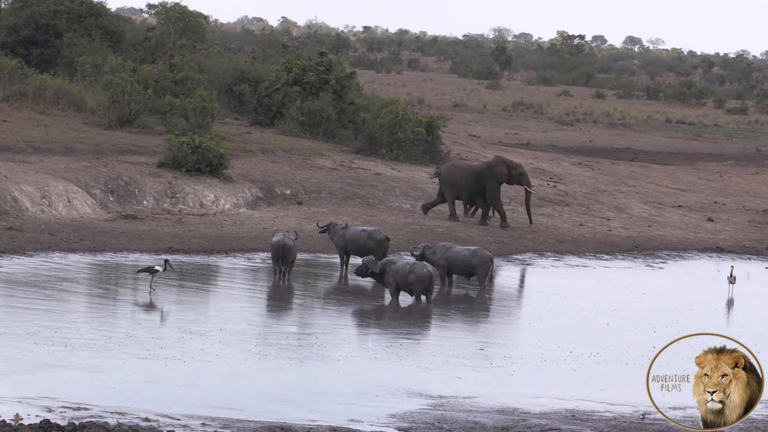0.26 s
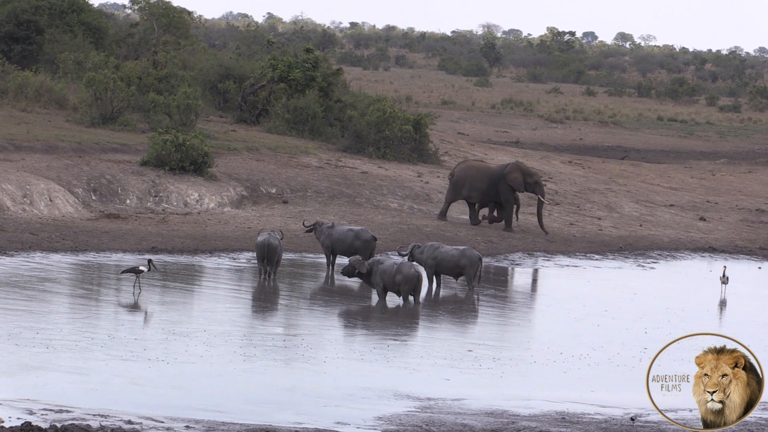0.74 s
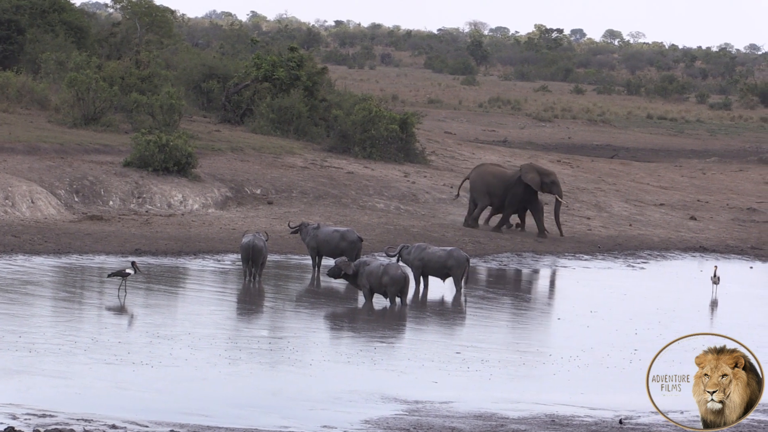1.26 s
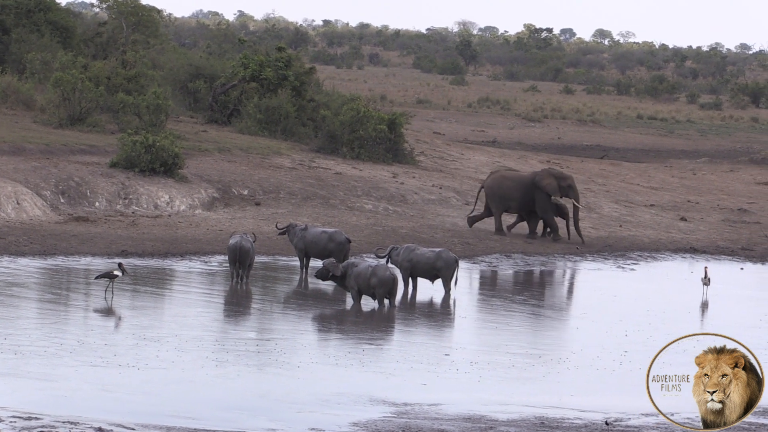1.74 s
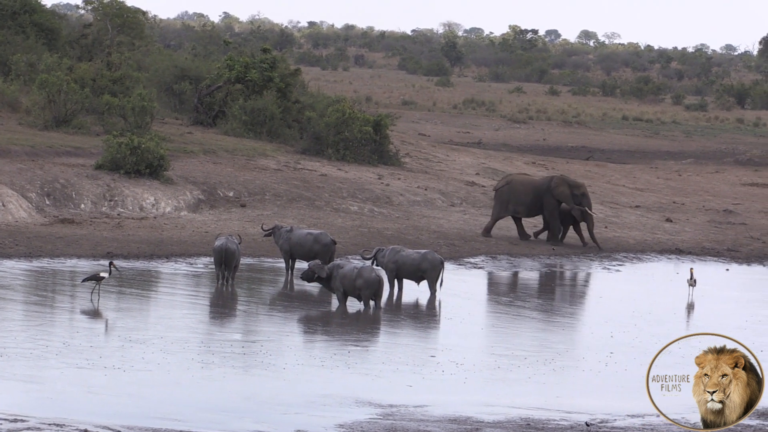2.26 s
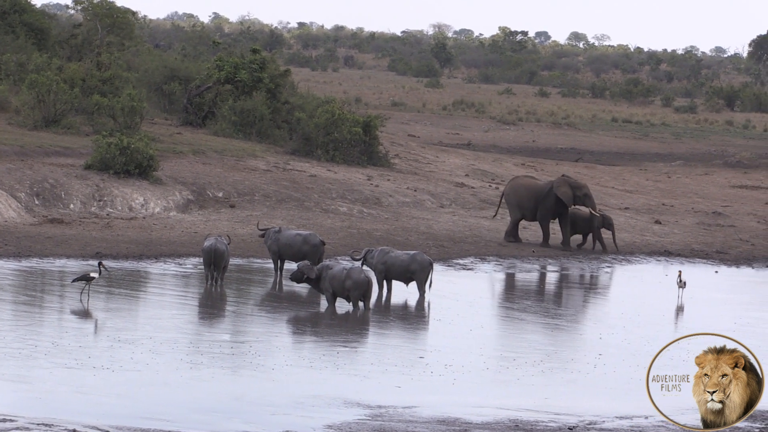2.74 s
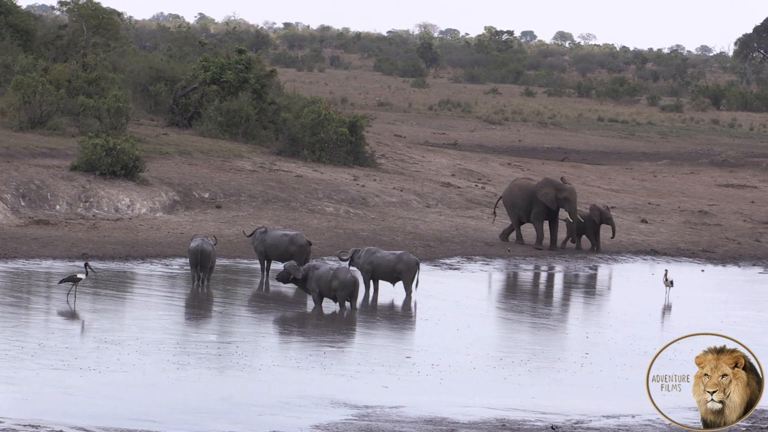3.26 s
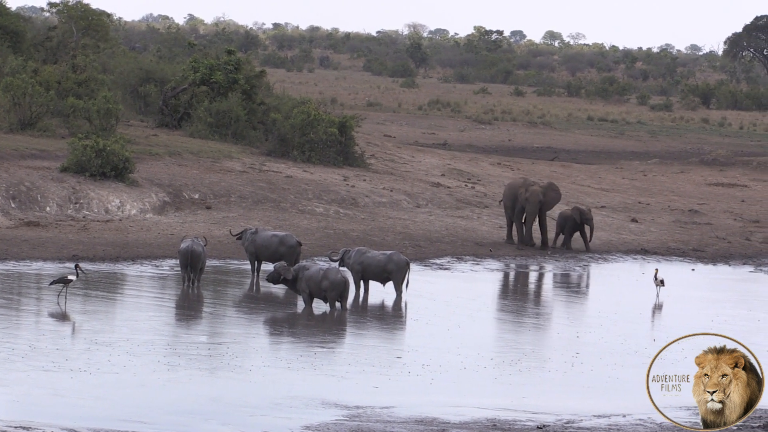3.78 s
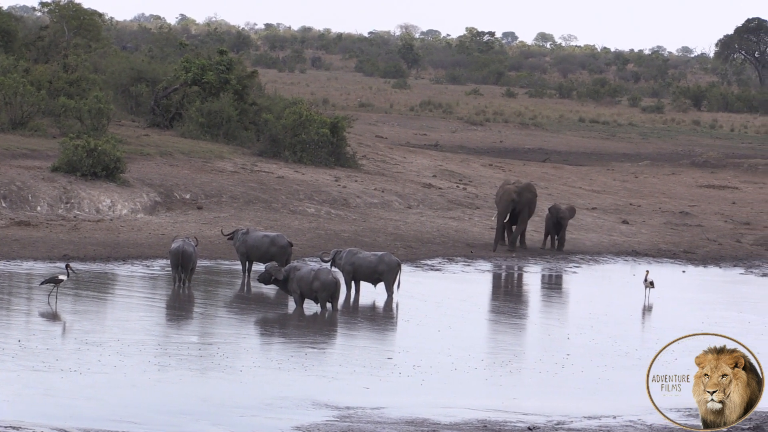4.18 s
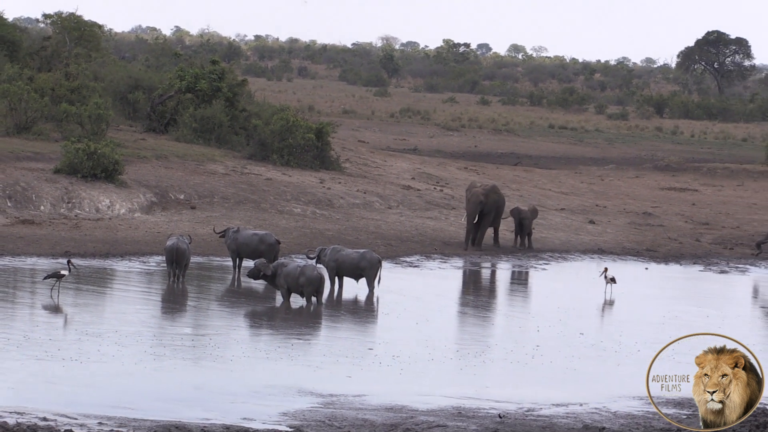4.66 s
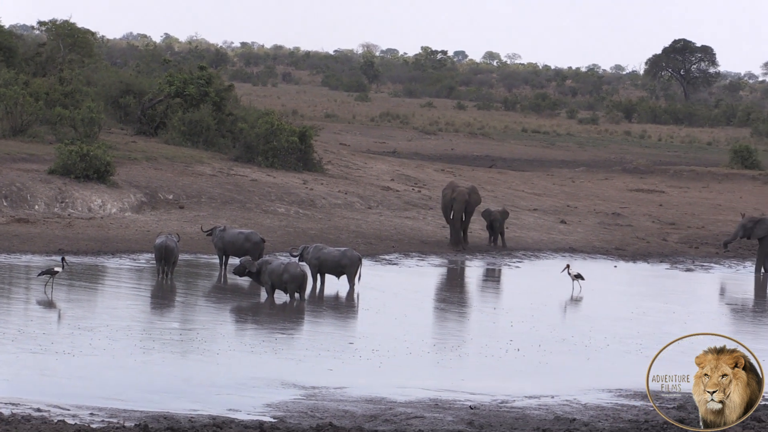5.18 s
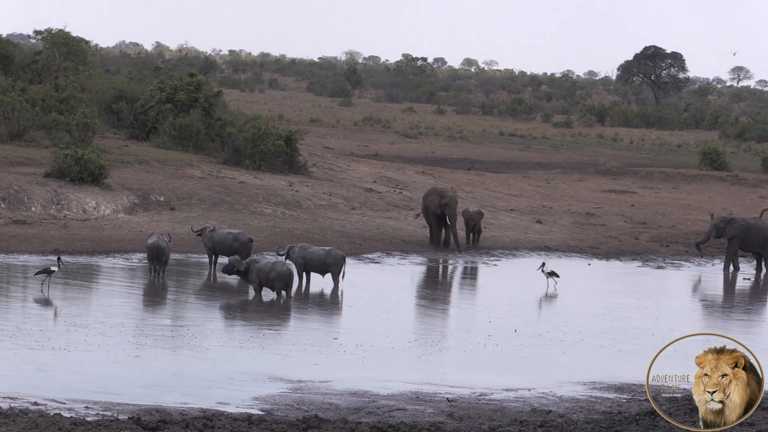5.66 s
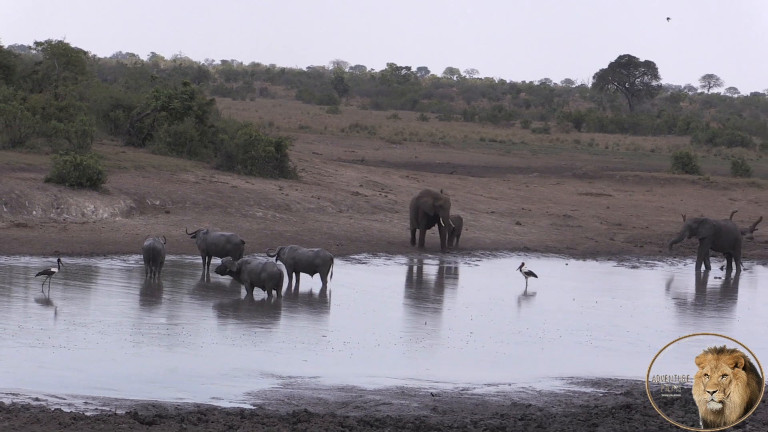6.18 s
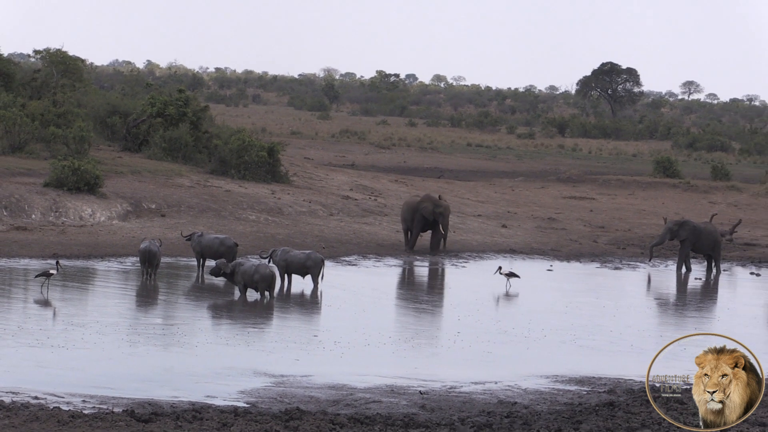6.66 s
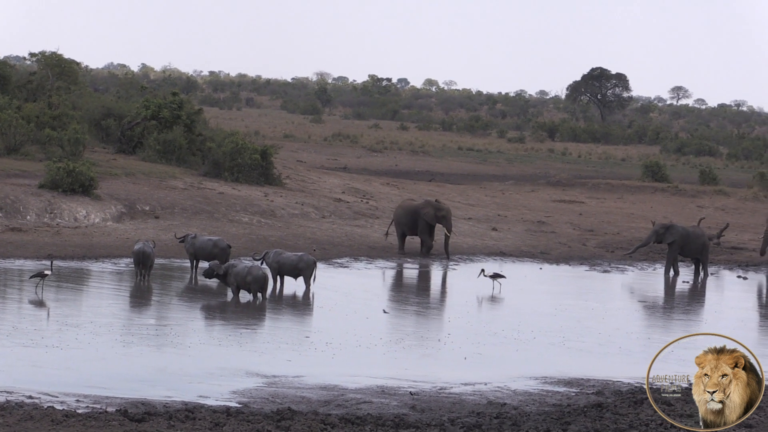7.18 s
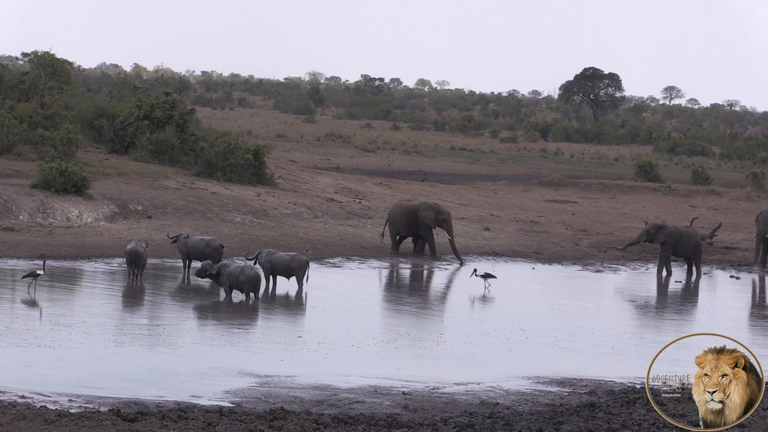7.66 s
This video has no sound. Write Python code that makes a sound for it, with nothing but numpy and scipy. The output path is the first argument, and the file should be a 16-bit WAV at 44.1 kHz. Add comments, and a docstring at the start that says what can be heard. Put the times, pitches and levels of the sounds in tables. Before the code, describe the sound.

Quick warbling bird whistles go on over soft open air and a faint engine hum, while wading animals splash and the water plops once.

```python
"""A waterhole in the bush. From the start, a few birds chatter in sliding, trilled whistles, small birds
chirp far off, and an engine idles low beneath the soft rush of open air. In the first second or so,
a puff of wind rumbles on the microphone. Wading animals then splash lightly, and at 3-4 s they push
the water in long swishes. Just after 5 s an air pocket rings with one hollow plop. The whistles go
on a little louder to the end, echoing off the banks, with two more splashes near 7 s."""
import sys
import numpy as np
from scipy import signal
from scipy.fft import rfft, irfft, next_fast_len
from scipy.io import wavfile
from scipy.ndimage import map_coordinates

SR = 44100
rng = np.random.default_rng(int(sys.argv[2]) if len(sys.argv) > 2 else 0)


def store_wav(level_fs):
    """Save 16-bit WAV to argv[1]."""
    pcm = np.round(np.clip(np.atleast_2d(level_fs), -1, 1) * 32767)
    wavfile.write(sys.argv[1], SR, pcm.T.astype(np.int16))


N = 349272  # samples, about 7.9 s


def flock(trill_db=1.14, leap=.28, yodel_beat_s=.04, yodel_beats=1.79):
    """Birds on different perches whistle three kinds of call, each with its own strength of echo."""
    # A flick is a quick jump up in pitch and back. It starts from the base pitch; leap sets its height.
    # Trills, rows of even flicks:
    # (first flick [s], base pitch [Hz], level [dB], beat [s], length after that flick [s])
    trill_calls = [(0.135, 1745, -46.5, 0.0201, 0.041), (0.8, 1754, -49.5, 0.0396, 0.069),
                   (.925, 1942, -48, 0.016, 0.044), (1.1, 1765, -46.5, 0.026, 0.0796),
                   (1.191, 1788, -47.5, 0.022, 0.07), (1.842, 1770, -47, 0.031, 0.069),
                   (2.233, 1827, -45.5, 0.024, 0.015), (2.761, 1800, -46.5, 0.0231, 0.072),
                   (3.161, 1792, -46.5, 0.022, 0.069), (3.353, 1756, -46, 0.028, 0.13),
                   (3.488, 1778, -50.5, 0.033, 0.075), (3.753, 1717, -46, 0.03, 0.089),
                   (3.975, 1960, -44.5, 0.016, 0.063), (4.083, 1784, -50, 0.0215, 0.098),
                   (4.174, 2025, -47, 0.022, 0.067), (4.368, 1714, -44, 0.03, 0.1),
                   (4.668, 1766, -51, 0.025, 0.057), (4.826, 1792, -42, 0.032, 0.084),
                   (4.857, 1870, -51, 0.038, 0.05), (5.245, 1775, -42.0, 0.026, 0.081),
                   (5.532, 1784, -43, 0.032, 0.12), (5.6, 1886, -50.5, 0.0289, 0.086),
                   (5.935, 1767, -41.5, 0.034, 0.084), (5.987, 1904, -44, 0.025, 0.063),
                   (6.289, 1768, -41, 0.0267, 0.053), (6.309, 1852, -40.5, 0.021, 0.056),
                   (6.509, 1808, -43, 0.034, 0.075), (6.548, 1834, -52, 0.029, 0.059),
                   (6.639, 1805, -43.5, 0.027, 0.075), (6.855, 1798, -43.5, 0.0352, 0.091),
                   (6.881, 1720, -46.5, 0.0218, 0.056), (7.03, 1738, -46, 0.03, 0.077),
                   (7.092, 1807, -51, 0.037, 0.088), (7.5, 1800, -48, 0.018, 0.061),
                   (7.577, 1736, -50, 0.036, 0.077)]
    # Yodels, one flick and then a falling arch: (flick [s], base pitch [Hz], level [dB])
    yodel_calls = [(0.095, 1993, -47), (1.621, 1955, -46.5), (2.005, 1967, -46.5), (2.652, 1940, -47),
                   (3.143, 1970, -49), (3.927, 2040, -48.5), (4.222, 1925, -47.5), (4.596, 1980, -46),
                   (4.967, 1938, -44), (5.549, 1907, -43), (5.91, 1950, -46.5), (6.341, 1875, -46.5),
                   (6.75, 1795, -46), (7.274, 1780, -45.0), (7.46, 1794, -44), (7.621, 1762, -43.5),
                   (7.863, 1752, -42.5)]
    # Whips, one peak that breaks off or sinks back: (peak [s], base pitch [Hz], level [dB], fall [s])
    whip_calls = [(0.195, 1855, -45, 0.033), (0.763, 1790, -51, 0.011), (0.842, 1908, -47, 0.0024),
                  (.89, 1834, -48.5, 0.0099), (1.31, 2060, -43.5, 0.002), (1.39, 2016, -45.5, 0.0026),
                  (1.881, 2032, -44, 0.0056), (1.96, 1920, -43.5, 0.02), (2.267, 1870, -44.0, 0.041),
                  (2.359, 2070, -45.5, 0.0033), (2.434, 2030, -45.5, 0.00317), (2.473, 1820, -45.5, 0.004),
                  (2.559, 1800, -42.5, 0.0041), (3.215, 1840, -41, 0.019), (3.523, 1875, -47, 0.041),
                  (4.302, 1746, -43.5, 0.014), (4.717, 1830, -55, 0.014), (5.076, 1853, -45, 0.0097),
                  (5.167, 1829, -43.5, 0.0048), (5.18, 1900, -45, 0.0036), (5.279, 1932, -39.5, 0.0068),
                  (5.359, 1920, -37.5, 0.011), (6.246, 1954, -38.5, 0.0072), (6.437, 1902, -42.5, 0.011),
                  (6.701, 1980, -43, 0.0128), (6.963, 1756, -47, 0.0035), (7.171, 2016, -40, 0.019),
                  (7.258, 2003, -41, 0.01), (7.488, 1920, -45, 0.011), (7.622, 1718, -42.5, 0.0018),
                  (7.892, 1885, -52, 0.016)]
    trills = [(*row, leap) for row in trill_calls]
    yodels = [(s, hz, db, yodel_beat_s, yodel_beats * yodel_beat_s, leap) for s, hz, db in yodel_calls]
    width_s, whip_leap, half_leap_s = .028, .212, .0127  # a longer fall makes a whip wider and lower
    whips = [(s, hz, db, width_s + fall, fall, whip_leap / (1 + fall / half_leap_s))
             for s, hz, db, fall in whip_calls]
    return (amp(trill_db) * whistles(trills, trill_tune, echo_db=-5.5)
            + whistles(yodels, yodel_tune, echo_db=-10)
            + whistles(whips, whip_tune, echo_db=-14.5))


def whistles(calls, tune, echo_db, throat_hz=1995, throat_width_hz=185, slide_s=.051, echo_s=.0085):
    """Nearly pure whistles slide up into a tune, loudest near the pitch at which the throat rings."""
    waver, flutter_db, slide_db = .019, 2.5, -2
    overtone_db, loud_db = -36, -37.5
    onset_s, release_s = .007, .0054
    track, size = np.zeros(N), SR // 3
    t = np.arange(size) / SR - slide_s  # zero at the first flick
    for s, base_hz, db, beat, length, leap in calls:
        early, late = np.clip(-t / slide_s, 0, 1), np.clip(t / length, 0, 1)
        sag = .0795 * early + .08 * early ** 4 + .0712 * late ** 4  # the pitch is low at both ends
        strain = np.clip(1 - 2 * early, .4, 1)  # the slide is smoother than the flicks
        hz = base_hz * (1 - sag + leap * tune(t / beat))
        hz *= 1 + strain * waver * wobble(504.8, size)
        gate = np.clip((t + slide_s) / onset_s, 0, 1) * np.clip((length - t) / release_s + .5, 0, 1)
        level = db + slide_db * np.minimum(2 * early, 1) - ((hz - throat_hz) / throat_width_hz) ** 2
        level += strain * flutter_db * wobble(300, size)
        phase = 2 * np.pi * np.cumsum(hz) / SR
        overtone = amp(overtone_db + db - loud_db) * np.sin(3 * phase)  # louder calls are brighter
        call = gate * amp(level) * (np.sin(phase) + overtone) / np.hypot(1, amp(echo_db))
        add(track, s - slide_s, call)
        delay = echo_s * (1 + rng.uniform(-1, 1) / 10)  # the near shore repeats each whistle
        add(track, s - slide_s + delay, amp(echo_db) * call)
    return track


def trill_tune(beats, narrow=5.17, shrink=.88):
    """A row of flicks, each a little lower than the last."""
    return flick(beats, narrow) * shrink ** np.maximum(beats, 0)


def yodel_tune(beats):
    """A sharp flick, a dip, then a broad arch that falls away."""
    # The path of the pitch: (time after the flick [beats], height [0 = base, 1 = top])
    pitch_path = [(-.25, 0), (0, 1), (.35, 0), (.55, -.1), (.9, 1), (1.3, .85), (2, -.1)]
    return np.interp(beats, *np.transpose(pitch_path))


def whip_tune(beats, narrow=3.36):
    """A single flick."""
    return flick(np.minimum(beats, .5), narrow)


def flick(beats, narrow):
    """One pitch peak per beat, quick up and slower down."""
    angle = np.pi * np.maximum(beats, -.5)
    return np.abs(np.cos(angle - .3 * np.sin(angle) ** 2)) ** narrow


def water(fizz_q=3):
    """Wading pushes a low wash ahead and throws up spray, with a fizz of falling droplets."""
    # Splashes: (loudest moment [s], rise [s], fall [s], level [dB], graininess [dB])
    splashes = [(.29, .01, .012, -65, 2), (1.375, 0.055, 0.024, -65, 4), (1.48, 0.035, 0.027, -65, 0),
                (1.6, 0.056, 0.033, -69, 4.5), (1.68, .024, 0.081, -55, 2.5), (3.022, 0.13, 0.13, -59, 2),
                (3.84, .17, .17, -54.5, 2.2), (4.25, 0.22, 0.22, -63, 1.5), (6.85, 0.17, .12, -62, 3.5),
                (7.71, 0.034, 0.024, -61.5, 3.5)]
    # Tone colour of the spray: (frequency [Hz], relative level [dB])
    spray_colour = [(900, -44), (1800, 3), (4000, -4.5), (6000, -10.5), (8000, -22.5), (13000, -50)]
    # Showers of fine droplets: (loudest moment [s], half-length [s], pitch [Hz], level [dB])
    droplets = [(1.373, 0.02, 7500, -71), (1.474, 0.017, 8000, -71), (1.658, .08, 6840, -72.5),
                (3.034, 0.041, 4640, -78)]
    # Water pushed aside: (time [s], level [dB])
    wash_levels = [(0, -71), (2.2, -63), (2.8, -56), (3.4, -52.5), (3.9, -51.5), (4.2, -57), (4.5, -93),
                   (7.9, -86)]
    # Tone colour of that wash: (frequency [Hz], relative level [dB])
    wash_colour = [(200, -21), (400, -4.5), (560, 4), (850, -6.5), (1300, -0.5), (1700, -22.5), (3000, -16),
                   (6000, -41)]
    t, grains = np.arange(N) / SR, wobble(400)
    spray_gain, fizz = np.zeros(N), np.zeros((2, N))
    for s, rise, fall, db, grain_db in splashes:
        width = np.where(t < s, rise, fall)
        spray_gain += amp(db + grain_db * grains) * np.exp(-((t - s) / width) ** 2 / np.sqrt(2))
    for s, half_length, hz, db in droplets:
        hiss = signal.lfilter(*signal.iirpeak(hz, fizz_q, SR), rng.standard_normal((2, N)))
        fizz += amp(db) * np.exp(-((t - s) / half_length) ** 2 / 2) * unit(hiss)
    wash = amp(curve(wash_levels)) * rush(wash_colour)
    return wash + spray_gain * rush(spray_colour) + fizz


def plop(s=5.195, hz=355, rise_per_s=4, db=-24, swell_s=.0058, ring_s=.061):
    """A big air pocket rings in the water, rising in pitch as it nears the surface."""
    track, t = np.zeros(N), np.arange(SR // 6) / SR
    ring = np.sin(2 * np.pi * hz * (t + rise_per_s * t * t / 2))
    swell = 1 - np.exp(-(t / swell_s) ** 2)
    add(track, s, amp(db - 60 * t / ring_s) * swell * ring)
    return track


def wind(cycles=.42):
    """Big swirls of air push the microphone to and fro; small ones rumble differently on each side."""
    # Pushes from big swirls: (time [s], pitch [Hz], level [dB], lean to the left [dB])
    pushes = [(0.373, 75, -41.5, -4), (0.467, 84, -39, -8), (.631, 125, -36.5, 8), (0.697, 74, -39.5, 9),
              (.73, 52, -36, 2), (0.748, 119, -45, 1), (0.833, 88, -39, 6), (1.234, 90, -43, -9)]
    # Strength of the rumble: (time [s], level [dB])
    rumble_levels = [(.25, -72), (.47, -48), (.57, -59), (.7, -39.5), (.92, -66), (1.22, -52.5), (2, -73)]
    # Tone colour of the small swirls: (frequency [Hz], relative level [dB])
    rumble_colour = [(20, -20.5), (55, 4), (80, -8), (110, 0.5), (200, -20), (400, -35), (900, -84)]
    bumps, t = np.zeros((2, N)), np.arange(-SR // 20, SR // 20) / SR
    for s, hz, db, lean_db in pushes:
        push = np.exp(-(t * hz / cycles) ** 2) * np.sin(2 * np.pi * hz * t)
        for side, sign in zip(bumps, (1, -1)):
            add(side, s + t[0], amp(db + sign * lean_db) * push)
    rumble = unit(filtered(rng.standard_normal((2, N)), lambda hz: amp(along(rumble_colour, hz))))
    return bumps + amp(curve(rumble_levels)) * rumble


def ticks(fade_s=.031, q=1.7):
    """Small ticks and drips: bursts of noise around one pitch that die away at once."""
    # Ticks and drips: (time [s], pitch [Hz], level [dB])
    hits = [(1.479, 2980, -55), (1.653, 3170, -49.5), (1.662, 3300, -59), (2.361, 3400, -55),
            (5.196, 3600, -61.5), (6.43, 2980, -60), (6.833, 1700, -58)]
    track, t = np.zeros(N), np.arange(SR // 20) / SR
    for s, hz, db in hits:
        crack = unit(signal.filtfilt(*signal.iirpeak(hz, q, SR), rng.standard_normal(len(t))))
        add(track, s, amp(db - 60 * t / fade_s) * crack)
    return track


def rasps(fall_share=.44, waver=.009, swell_share=.26, uneven_db=3):
    """A small bird's raspy chirp drops in pitch while its overtones swell one after another."""
    # Chirps: (time [s], length [s], starting pitch [Hz], level [dB])
    chirps = [(1.264, 0.094, 730, -66.5), (2.166, .115, 824, -66.5), (4.431, 0.14, 863, -66.5),
              (5.408, .105, 785, -68.5), (5.585, 0.14, 803, -67), (6.129, .11, 826, -60.5),
              (6.874, .08, 797, -65.5)]
    # Their overtones: (frequency [times the pitch], loudest point [share of the length], level [dB])
    overtones = [(6, .16, -3), (7, .33, 1), (8, .48, -6), (9.2, .66, -2), (10.3, .66, -4)]
    track, size = np.zeros(N), SR // 6
    for s, length, start_hz, db in chirps:
        progress = np.minimum(np.arange(size) / SR / length, 1)
        pitch = start_hz * (1 - fall_share * np.sin(np.pi * progress / 2))
        for multiple, peak, overtone_db in overtones:
            stray = waver * (wobble(403, size) + 2 * wobble(23, size))
            shape = np.exp(-((progress - peak) / swell_share) ** 2)
            shape *= np.abs(np.sin(np.pi * progress)) ** .5  # silent at both ends
            gain = amp(db + overtone_db + uneven_db * wobble(61, size))
            add(track, s, gain * shape * tone(multiple * pitch * (1 + stray)))
    return track


def small_birds(note_s=.077, thin_fall=.24, twitter_count=56, twitter_hz=4500, twitter_db=-73):
    """Far-off birds sing arched notes, thin falling notes and a faint twitter from the bushes."""
    # Arched or buzzing notes: (time [s], pitch [Hz], level [dB], warble rate [Hz])
    arched_notes = [(4.63, 2520, -68, 8), (4.84, 2546, -66, 9.5), (5.555, 2600, -57, 7.7),
                    (5.681, 3210, -55, 8), (5.733, 3370, -60, 70), (7.234, 2820, -64, 8.2),
                    (7.316, 3060, -58, 12), (7.44, 2930, -61, 50)]
    # Thin falling notes: (time [s], length [s], starting pitch [Hz], level [dB])
    thin_notes = [(.02, 0.06, 3450, -68), (.875, 0.064, 3400, -66), (1.17, 0.036, 3700, -64),
                  (5.81, 0.2, 4527, -75), (6.67, 0.078, 4690, -68)]
    repeats = [(.13 + k * .278, .087, 4820, -69.5) for k in range(4)]  # one thin note, evenly repeated
    notes = [(s, note_s, hz, hz, db, warble_hz) for s, hz, db, warble_hz in arched_notes]
    for s, length, hz, db in repeats + list(thin_notes):
        notes.append((s, length, hz, hz * (1 - thin_fall), db, 0))
    times = (np.arange(twitter_count) + rng.random(twitter_count)) * N / SR / twitter_count
    for s, (longer, higher) in zip(times, rng.uniform(-1, 1, (twitter_count, 2))):
        length, hz = .05 * np.exp(longer / 2), twitter_hz * np.exp(higher / 3)
        notes.append((s, length, hz, .8 * hz, twitter_db - 5 * higher, 500))  # fast, raspy warble
    return gliding_notes(notes)


def gliding_notes(notes, waver=.013):
    """Bird notes swell and fade; a fast warble makes them raspy, a slower one makes a buzz or an arch."""
    track, size = np.zeros(N), SR // 6
    t = np.arange(size) / SR
    for s, length, start_hz, end_hz, db, warble_hz in notes:
        progress = np.minimum(t / length, 1)
        glide = start_hz + (end_hz - start_hz) * progress
        warble = (350 + warble_hz / 4) * np.sin(2 * np.pi * warble_hz * t)
        hz = (glide + warble) * (1 + waver * wobble(400, size))
        add(track, s, amp(db) * np.sin(np.pi * progress) * tone(hz))
    return track


def bank_echoes(sound, scatter_db=-8, scatter_s=.073, tail_db=-22.5):
    """The near shore scatters the sound at once, ever differently; the far bank returns a faint tail."""
    # How the far bank's tail changes: (frequency [Hz], time to fall 60 dB [s]; a negative time grows)
    tail_times = [(300, -1.3), (2000, 2.3), (8000, -1.8)]
    # Tone colour of the tail: (frequency [Hz], relative level [dB])
    tail_colour = [(1500, -18.5), (2200, 5.5), (2580, 18), (2900, -10), (6000, -11.5)]
    hz, t, noise = signal.stft(rng.standard_normal((2, SR // 2)), SR, nperseg=256)
    levels = along(tail_colour, hz)[:, None] - 60 * t / along(tail_times, hz)[:, None]
    tail = signal.istft(noise * amp(levels), SR, nperseg=256)[1]
    tail /= np.linalg.norm(tail[0])
    echoes = amp(tail_db) * signal.fftconvolve(sound[None], tail, axes=1)[:, :N]
    size = SR // 4 * 2
    fade = unit(amp(-60 * np.arange(size) / SR / scatter_s)) / np.sqrt(size)
    window = np.hanning(size)
    for start in range(0, N, size // 2):  # each overlapping piece gets its own random echo
        piece = sound[start:start + size]
        for side in echoes:
            scattered = signal.fftconvolve(piece * window[:len(piece)], fade * rng.standard_normal(size))
            add(side, start / SR, amp(scatter_db) * scattered)
    return echoes


def engine(drift=.22, unsteady_db=-.5):
    """An idling engine hums in a few tones; the higher ones waver more."""
    # Engine tones: (pitch [Hz], average level [dB])
    hums = [(55.3, -55.5), (111, -65.5), (166, -66), (239, -61), (717, -83), (1050, -70.5)]
    t, track = np.arange(N) / SR, np.zeros(N)
    lowest_hz = hums[0][0]
    for hz, db in hums:
        phase = 2 * np.pi * hz * t + drift * np.sqrt(hz / lowest_hz) * wobble(5)
        track += np.sqrt(2) * amp(db + unsteady_db * wobble(3.435)) * np.sin(phase)
    return track


def air(db=-53, easing_db=-1.5):
    """The soft rush of open country eases slowly, while its middle pitches swell and sink."""
    # Tone colour of open air: (frequency [Hz], relative level [dB])
    air_colour = [(25, -19), (50, -3), (80, -8.5), (115, -1), (200, 0.5), (300, -4), (650, -4),
                  (1000, -10.5), (1400, -15.5), (2600, -20), (4500, -27.5), (7000, -33.5), (12500, -44)]
    # Tone colour of its middle pitches: (frequency [Hz], relative level [dB])
    middle_colour = [(300, -28), (700, 4), (1200, 1), (1700, 4.5), (3000, -30.5)]
    # Their swelling and sinking: (time [s], level [dB])
    middle_levels = [(0, -64), (2.5, -64.5), (4.4, -65.5), (5.4, -61.5), (6.1, -71), (6.8, -62), (7.4, -66),
                     (7.9, -59.5)]
    broad = amp(db + np.linspace(0, easing_db, N)) * rush(air_colour)
    return broad + amp(curve(middle_levels)) * rush(middle_colour)


def rush(colour):
    """Stereo noise of strength 1 with a given tone colour, centred in the bass and wide in the treble."""
    # How alike left and right are: (frequency [Hz], likeness [0 = unrelated, 1 = the same])
    likeness = [(50, 1), (200, 0.95), (1000, 0.84), (2500, 0.35), (5000, 0.028), (10000, 0.097)]

    def response(hz):
        spread = np.arccos(np.clip(along(likeness, hz), -1, 1)) / 2
        return amp(along(colour, hz)) * [np.cos(spread), np.sin(spread)]

    mid, side = filtered(rng.standard_normal((2, N)), response)
    return unit(np.array([mid + side, mid - side]))


def amp(db):
    """Turn decibels into a gain."""
    return 10 ** (np.asarray(db) / 20)


def unit(x):
    """Scale a signal to an average strength (rms) of 1."""
    return x / np.sqrt(np.mean(x ** 2) + 1e-20)


def tone(hz):
    """A pure tone that follows a changing pitch."""
    return np.sin(2 * np.pi * np.cumsum(hz) / SR)


def along(points, hz):
    """Read between (frequency [Hz], value) points on a musical (log) scale."""
    frequencies, values = np.transpose(points)
    return np.interp(np.log(hz + 1), np.log(frequencies + 1), values)


def curve(rows):
    """Join (time [s], value) points into one value per sample."""
    return np.interp(np.arange(N) / SR, *np.transpose(rows))


def wobble(rate, size=N):
    """A smooth curve through random points, rate of them a second."""
    points = rng.standard_normal(int(size * rate / SR) + 4)
    return map_coordinates(points, [np.arange(size) * rate / SR])


def filtered(x, response):
    """Scale each frequency of a signal by response(hz)."""
    size = next_fast_len(N + SR // 2)
    return irfft(rfft(x, size) * response(np.fft.rfftfreq(size, 1 / SR)), size)[..., :N]


def add(track, s, sound):
    """Mix a sound into the track at s seconds."""
    start = max(0, round(s * SR))
    room = track[start:start + len(sound)]
    room += sound[:len(room)]


def scene(far_db=-2, far_echo_db=6):
    """The near sounds sit just right of centre; the small birds are farther off, with more echo."""
    far = amp(far_db) * small_birds()
    near = flock() + rasps() + plop() + ticks()
    direct = near * amp([[-.35], [.35]]) + far
    echoes = bank_echoes(near + amp(far_echo_db) * far)
    return direct + echoes + water() + engine() + air() + wind()


def record(dry, top_hz=12950):
    """The very highest treble is cut away."""
    return filtered(dry, lambda hz: hz < top_hz)


dry = scene()
out = record(dry)
store_wav(out)
```